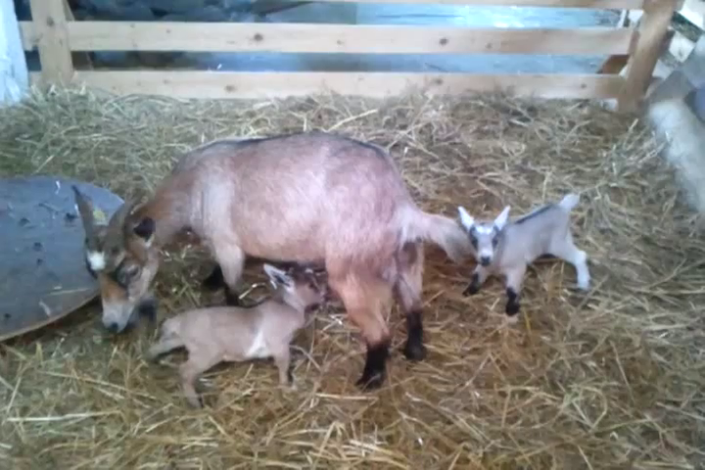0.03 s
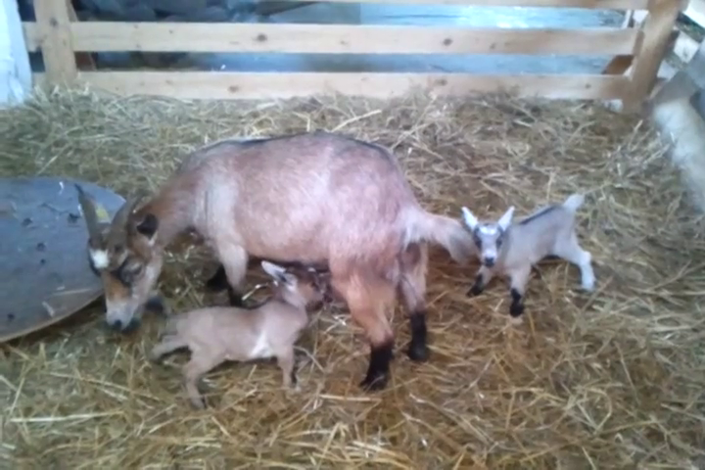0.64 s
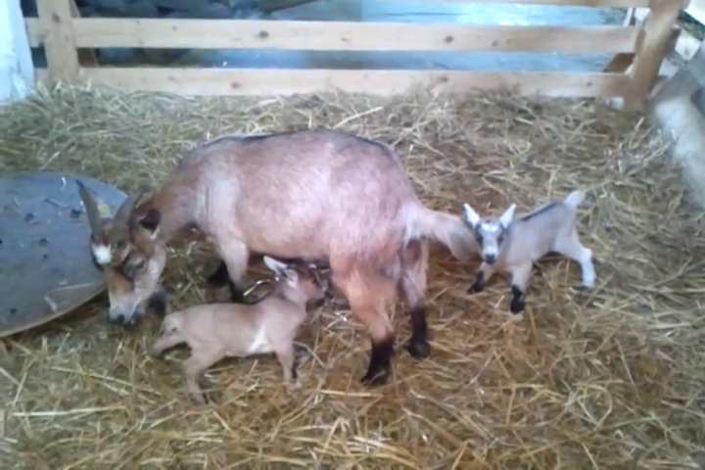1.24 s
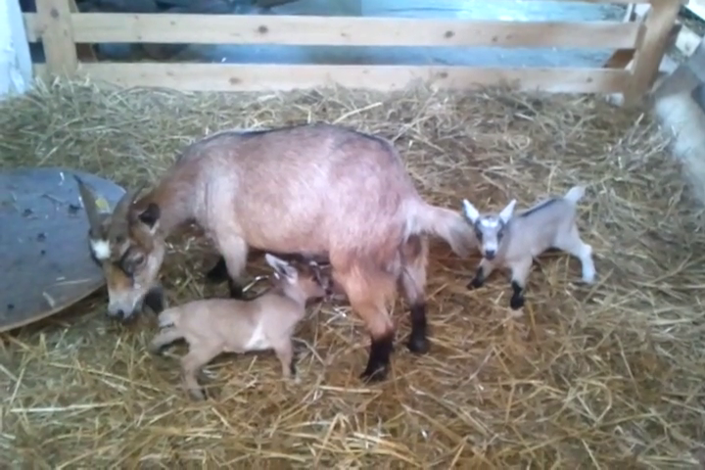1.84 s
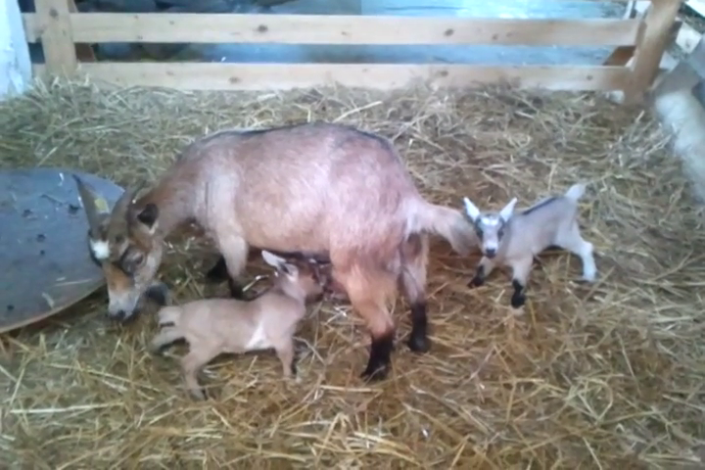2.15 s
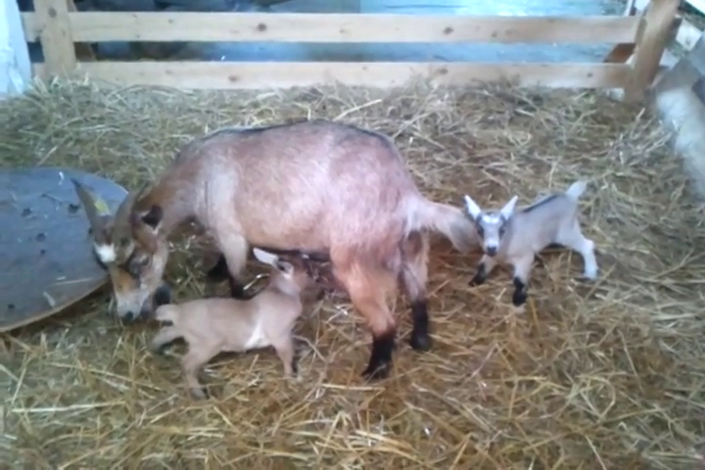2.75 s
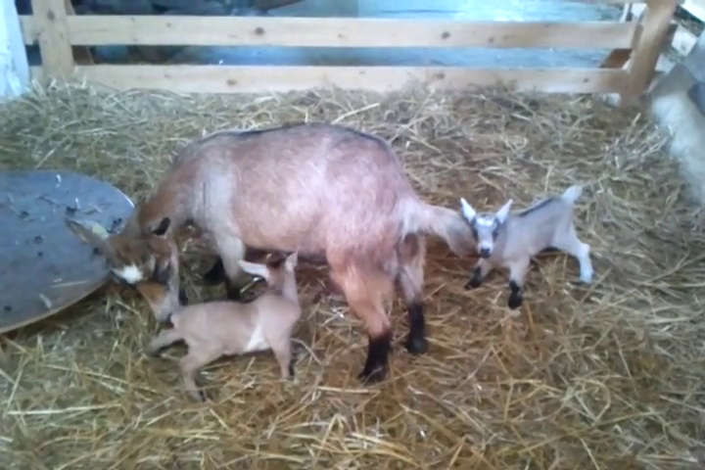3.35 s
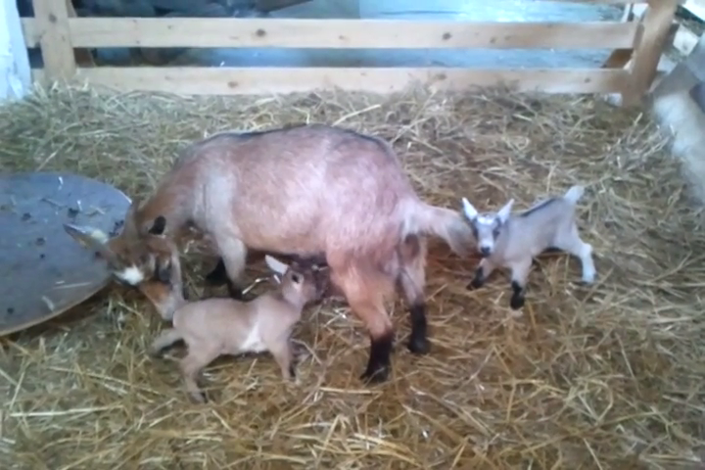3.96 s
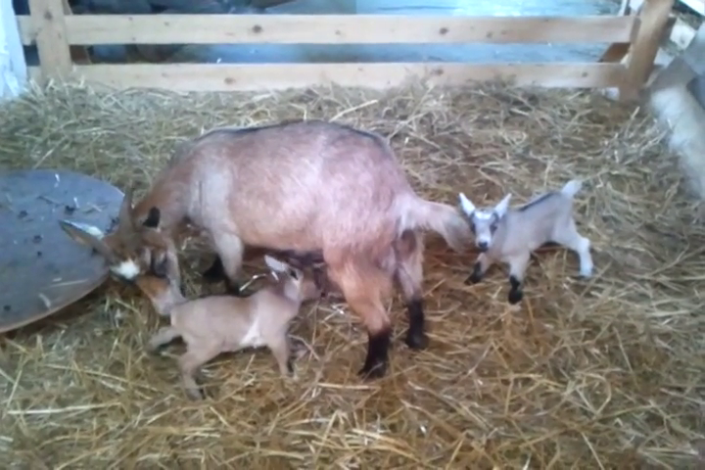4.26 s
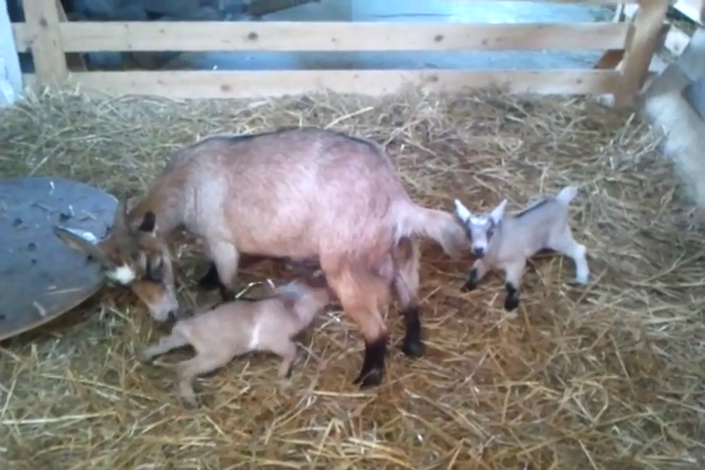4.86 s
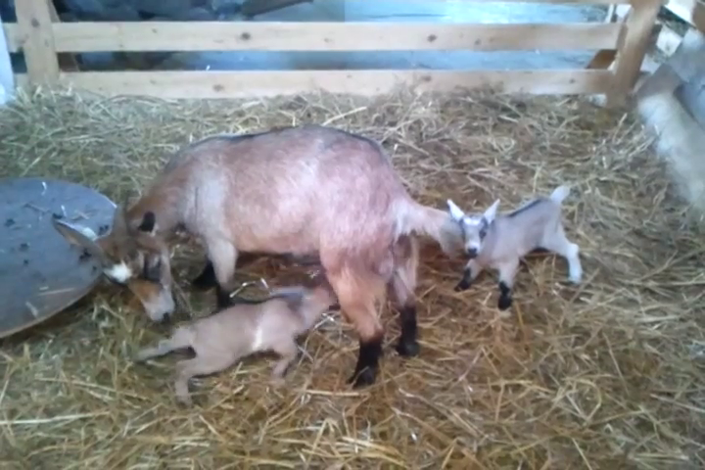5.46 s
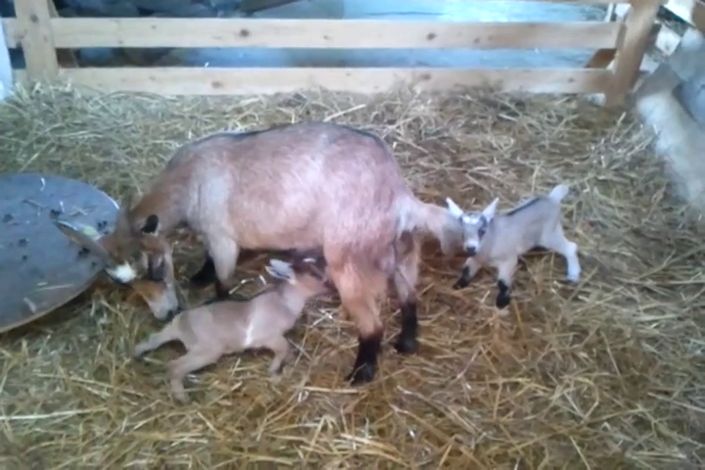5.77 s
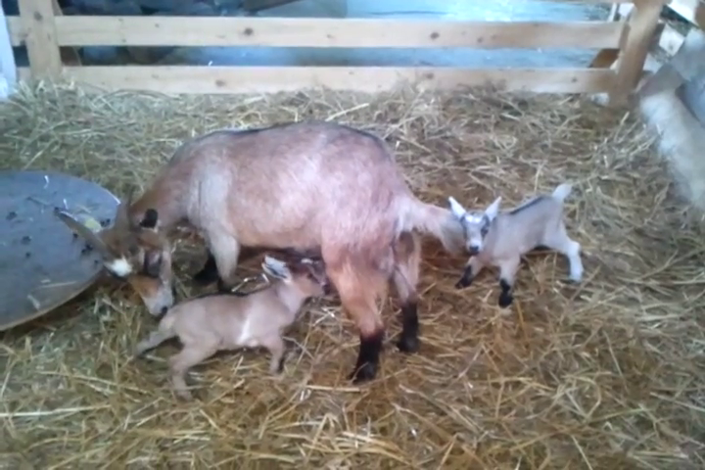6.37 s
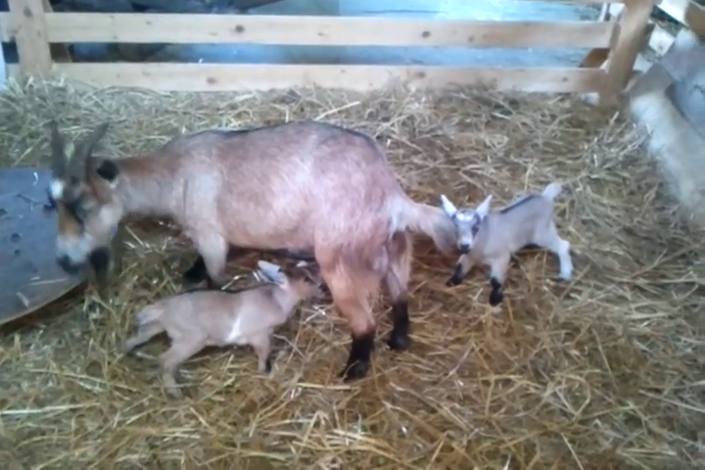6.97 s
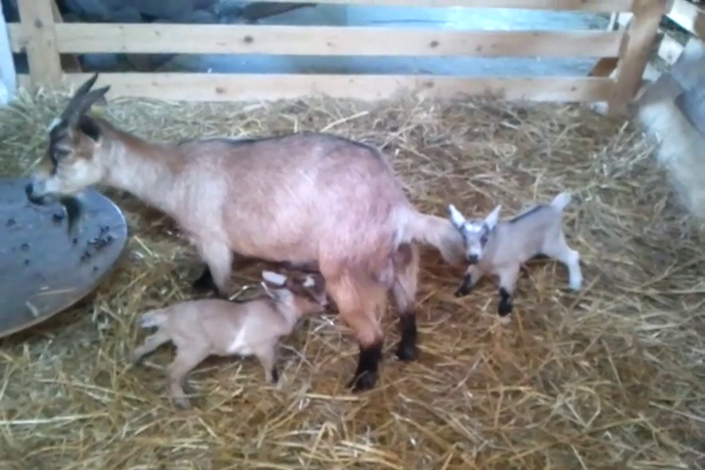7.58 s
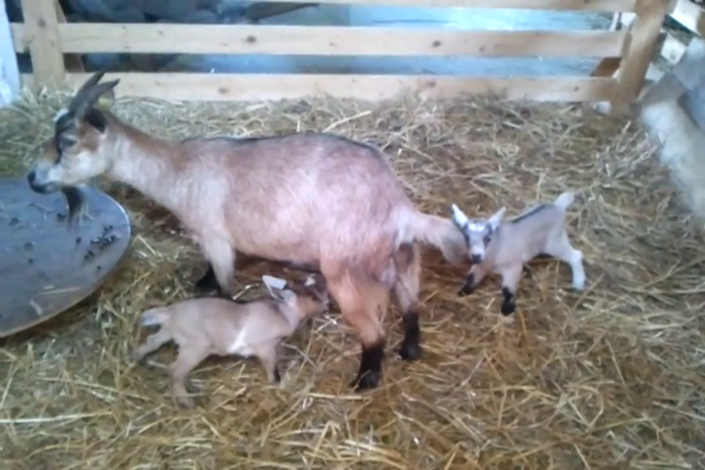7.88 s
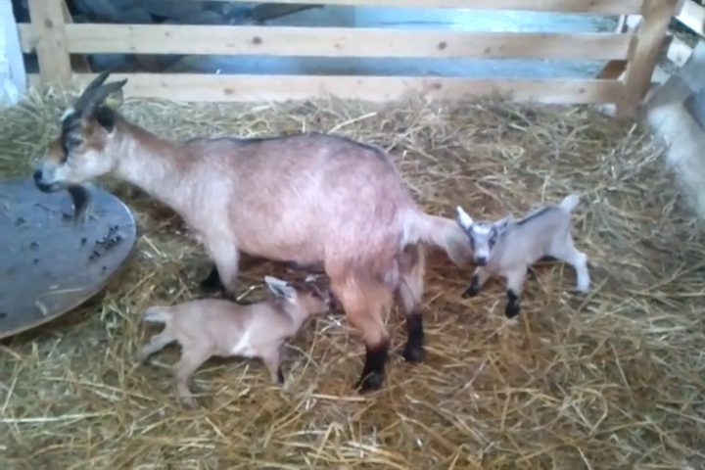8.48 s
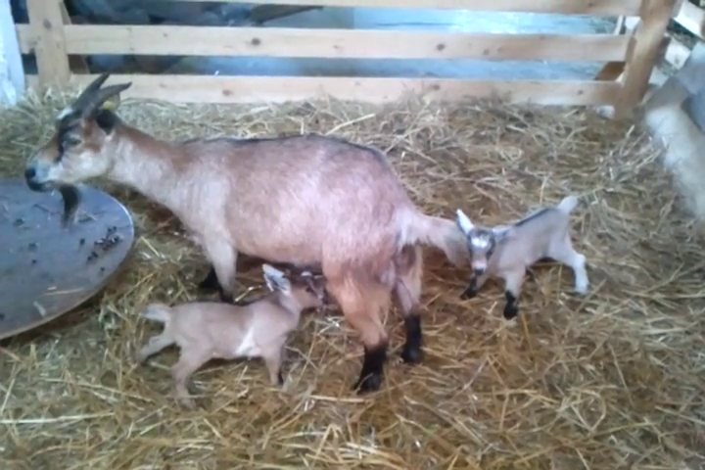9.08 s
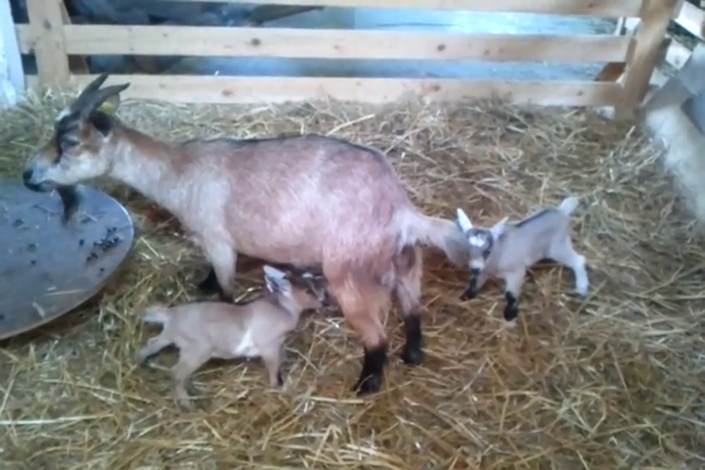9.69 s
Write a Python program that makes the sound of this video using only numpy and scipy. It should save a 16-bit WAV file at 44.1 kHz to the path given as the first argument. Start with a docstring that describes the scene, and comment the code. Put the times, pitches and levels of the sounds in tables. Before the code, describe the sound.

After silence, a steady microphone hiss fades in at about 0.7 seconds, together with a low outdoor rumble and two distant engines. One drones with a wavering level; the other slowly rises in pitch and fades after 5 seconds. Straw ticks very faintly under goats in a wooden pen. A slight rustle comes at 1 second, and soft knocks of hooves or mouths at about 2 and 2.5 seconds. From 4 to 5.7 seconds dry stalks snap and rustle, with a dull hoof knock just after 5. A second cluster of crackles, rustles and light knocks runs from 6.8 to 7.8 seconds, with the sharpest snap at 7.5. A few quick knocks and soft thuds follow around 9.2 seconds. The hiss grows a little louder towards the end, and the whole scene stays quiet.

```python
"""Goats in a straw pen

Inside a wooden pen, stalks snap and rustle as a kid nurses, with soft knocks of hooves and mouths.
Far outside, two engines drone over a low rumble, one steady and one slowly speeding up.
The small camera switches on after a moment; the hiss of its one microphone covers everything."""
import sys
import numpy as np
from scipy import signal
from scipy.fft import rfft, irfft, next_fast_len
from scipy.io import wavfile
from scipy.ndimage import uniform_filter1d

SR = 44100
rng = np.random.default_rng(int(sys.argv[2]) if len(sys.argv) > 2 else 0)


def put_to_file(sound):
    """Save the sound as 16-bit audio at rate SR, in the file named by the first command-line argument."""
    columns = np.atleast_2d(sound).T  # one column per channel
    safe = np.clip(columns, -1, 1)
    whole_steps = np.round(safe * 32767)
    wavfile.write(sys.argv[1], SR, whole_steps.astype(np.int16))


N = 429534
T = np.arange(N) / SR


def undb(db):
    """Decibels to gain."""
    return 10 ** (np.asarray(db) / 20)


def unit(x):
    """Scale to rms 1."""
    return x / np.sqrt(np.mean(x ** 2))


def curve(points):
    """A line through (time_s, value) points, one value a sample."""
    return np.interp(T, *np.transpose(points))


def walk(rate):
    """Smooth random drift of rms 1, changing about rate times a second."""
    step = max(int(SR / rate), 2)
    held = np.repeat(rng.standard_normal(N // step + 1), step)
    return unit(uniform_filter1d(uniform_filter1d(held, step), step)[:N])


def coloured(points):
    """Noise of rms 1, its spectrum shaped by (freq_hz, density_db) points."""
    hz, db = np.transpose(points)
    size = next_fast_len(N)
    bins_hz = np.maximum(np.fft.rfftfreq(size, 1 / SR), 1)
    gain = undb(np.interp(np.log(bins_hz), np.log(hz), db)) * np.minimum(bins_hz / hz[0], 1)
    return unit(irfft(rfft(rng.standard_normal(size)) * gain, size)[:N])


def resonate(x, hz, width_hz):
    """One resonance, gain 1 at its centre."""
    return signal.lfilter(*signal.iirpeak(hz, hz / width_hz, fs=SR), x)


def burst(t60_s, click=0):
    """A quarter second of dying noise, with an optional click at its start."""
    t = T[:SR // 4]
    return click * (t == 0) + rng.standard_normal(len(t)) * np.exp(-np.log(1000) * t / t60_s)


def add(out, start_s, x):
    """Mix x into out from start_s on."""
    i = int(start_s * SR)
    out[i:i + len(x)] += x[:N - i]


def outdoor_rumble(hum_hz=50):
    """Beyond the pen: a rumble that swells a little, and a faint deep hum; the upper part of this noise, up to
    9 kHz, is the microphone's own steady floor."""
    # rumble below, the microphone's steady floor with a bump near 8 kHz on top: freq_hz, density_db
    spectrum = [(20, -7), (35, 0), (50, -1), (68, -2.5), (110, -3), (170, -7.5), (280, -11), (450, -15),
                (800, -19), (1600, -23), (2500, -23), (3200, -26.5), (5500, -33), (8000, -20.5),
                (11000, -44.5)]
    rumble = coloured(spectrum) * undb(-44.5 + .5 * walk(4))
    hum = undb(-53.5 + 1.4 * walk(5)) * np.sin(2 * np.pi * hum_hz * T)
    return rumble + hum


def microphone_hiss():
    """The microphone's own smooth noise, a little louder towards the end."""
    # colour of the hiss: freq_hz, density_db
    spectrum = [(500, -8.5), (1400, -6.5), (2400, -8.5), (3200, -10.5), (3950, 0.5), (4600, 2), (5100, 0.5),
                (5600, -2.5), (6250, 2), (7000, -1.5), (8100, 0.5), (9000, 0.5)]
    # slow drift of the hiss: time_s, level_db
    levels = [(1, -41), (3.6, -43.5), (5.1, -40.5), (6.2, -41.5), (7.8, -38.5), (9.4, -36)]
    return coloured(spectrum) * undb(curve(levels) + 0.4 * walk(12))


def steady_engine():
    """A far engine: only four low harmonics reach the pen, and moving air makes them waver."""
    # firing rate, sagging a little under load and recovering: time_s, pitch_hz
    firing_rate = [(.7, 85.1), (5.2, 84.46), (8.3, 82.45), (9.74, 84.2)]
    # drone at the firing rate, before trim and waver: time_s, level_db
    drone_levels = [(0.9, -41.5), (3.72, -55.5), (5.19, -46.5), (5.43, -56), (6.34, -43), (6.39, -55),
                    (6.71, -41), (6.98, -47.5), (7.27, -39.5), (7.81, -54), (8.23, -39), (8.67, -59),
                    (9.38, -42.5), (9.7, -47.5)]
    # hum an octave and a fifth higher, before trim and waver: time_s, level_db
    hum_levels = [(0.9, -51), (1.46, -51), (1.83, -63), (2.0, -47.5), (2.74, -57), (3.86, -61.5),
                  (4.13, -48), (4.35, -54.5), (4.77, -45), (4.87, -49.5), (5.14, -37), (5.29, -47.5),
                  (6.1, -58.5), (7.32, -48), (7.67, -55.5), (8.72, -59.5), (9.23, -55), (9.7, -62.5)]
    drone_trim_db, hum_trim_db = -1, -0.1
    firing_hz = curve(firing_rate) * (1 + .003 * walk(7))
    phase = 2 * np.pi * np.cumsum(firing_hz) / SR
    drone_db = curve(drone_levels) + drone_trim_db + 1.5 * walk(7)
    hum_db = curve(hum_levels) + hum_trim_db + 1.6 * walk(9)
    # the even harmonics are weak and follow the odd ones below them
    harmonics_db = [drone_db, drone_db - 15, hum_db, np.minimum(hum_db - 9.5, -57)]
    return np.sqrt(2) * sum(undb(db) * np.sin(k * phase) for k, db in enumerate(harmonics_db, 1))


def climbing_engine():
    """A second far engine speeds up evenly: one low tone that swells, holds and dies away."""
    start_hz, climb_hz_per_s = 118.9, 2.5
    hold_db, hold_from_s, hold_to_s = -45.5, 1.48, 5.21
    rise_db_per_s, fall_db_per_s = 19, 5.5
    pitch_hz = start_hz + climb_hz_per_s * T
    rise_db = rise_db_per_s * np.minimum(T - hold_from_s, 0)
    fall_db = fall_db_per_s * np.minimum(hold_to_s - T, 0)
    level_db = hold_db + rise_db + fall_db + 2 * walk(8.7)
    return np.sqrt(2) * undb(level_db) * np.sin(2 * np.pi * np.cumsum(pitch_hz) / SR)


def knocks(thud_hz=230, thud_t60_s=.03):
    """Each contact in the pen rings briefly; weight on the bedding adds a dull thud."""
    # knocks and clicks of hooves and mouths: start_s, peak_db, ring_hz, width_hz, t60_s, thud_db
    contacts = [(1.94, -40.5, 900, 700, 0.066, -60), (1.978, -39, 1646, 110, 0.16, -60),
                (2.485, -40, 1100, 900, 0.17, -60), (4.67, -41, 520, 450, .16, -60),
                (5.1465, -28.5, 1000, 523, 0.0096, -30), (6.788, -43, 1240, 500, 0.031, -60),
                (7.036, -38, 1580, 600, 0.03, -60), (7.085, -32, 2300, 2183, 0.09, -60),
                (7.63, -41, 400, 400, 0.11, -33), (9.21, -33.5, 2050, 600, .018, -27),
                (9.216, -38, 1500, 160, 0.17, -64), (9.24, -36, 1500, 1200, 0.066, -64),
                (9.277, -49, 900, 900, .04, -30)]
    out = np.zeros(N)
    t = T[:SR // 4]
    thud = np.sin(2 * np.pi * thud_hz * t) * np.exp(-np.log(1000) * t / thud_t60_s)
    for start_s, peak_db, ring_hz, width_hz, t60_s, thud_db in contacts:
        ring = resonate(burst(t60_s, click=8.2), ring_hz, width_hz)
        ring = resonate(ring, ring_hz, 2 * width_hz)
        add(out, start_s, undb(peak_db) * ring / np.abs(ring).max() + undb(thud_db) * thud)
    return out


def stalk_ring(x, centre_hz):
    """Hollow stalks ring; their thickness decides which range speaks most."""
    # resonances of a stalk: ring_hz, width_hz, gain_db
    modes = [(3970, 440, 5.5), (4440, 930, 8.5), (6020, 290, 3), (7120, 820, -2), (8750, 2300, 6)]
    ring = sum(undb(db) * resonate(x, hz, width_hz) for hz, width_hz, db in modes)
    # thin stalks radiate little below their lowest ring
    low_cut = signal.butter(3, modes[0][0] - 500, "high", fs=SR, output="sos")
    return resonate(signal.sosfilt(low_cut, ring), centre_hz, width_hz=2000)


def straw_ticks(ticks_per_s=14):
    """The bedding keeps ticking faintly under the animals' weight."""
    impulses = (rng.random(N) < ticks_per_s / SR) * rng.standard_normal(N)
    ticks = signal.fftconvolve(impulses, burst(t60_s=0.024))[:N]
    return undb(-60.5) * unit(stalk_ring(ticks, centre_hz=6800))


def straw_rustles(cracks_per_s=3000):
    """Brushed straw gives a swell of tiny uneven cracks."""
    # legs and muzzles brushing the straw: middle_s, level_db, half_length_s, centre_hz
    brushes = [(1.074, -49, .05, 8080), (4.977, -42.5, 0.057, 6800), (5.2, -54, .12, 5200),
               (5.598, -44.5, 0.032, 7200), (6.812, -44, 0.019, 7146), (7.54, -44, .015, 5800),
               (7.644, -47, 0.025, 6800), (7.749, -50, .02, 4500)]
    out = np.zeros(N)
    t = T[:SR // 2] - 1 / 4
    for middle_s, level_db, half_length_s, centre_hz in brushes:
        cracks = rng.standard_normal(len(t)) * (rng.random(len(t)) < cracks_per_s / SR)
        swell = np.exp(-(t / half_length_s) ** 2)
        add(out, middle_s + t[0], undb(level_db) * unit(stalk_ring(cracks, centre_hz)) * swell)
    return out


def straw_snaps():
    """Single dry stalks crack; the boards of the pen add a short tail."""
    # stalks breaking: start_s, peak_db, centre_hz, t60_s
    snaps = [(4.094, -29, 7500, .02), (4.241, -28, 7400, .03), (4.776, -31, 6000, .02),
             (4.917, -30, 7200, .02), (5.1463, -36, 7000, .01), (5.602, -29, 7200, .035),
             (5.7047, -21.5, 7700, 0.02), (7.085, -20.5, 7690, 0.06), (7.316, -27, 6030, .045),
             (7.5285, -16, 6100, 0.027), (7.731, -27, 4460, .03), (7.746, -32, 4800, 0.044)]
    out = np.zeros(N)
    for start_s, peak_db, centre_hz, t60_s in snaps:
        fracture = burst(t60_s, click=7.8)
        board_tail = undb(-14) * burst(t60_s=0.13)
        crack = stalk_ring(fracture + board_tail, centre_hz)
        add(out, start_s, undb(peak_db) * crack / np.abs(crack).max())
    return out


def scene():
    """The pen and the far engines, heard by one microphone."""
    background = steady_engine() + climbing_engine() + outdoor_rumble() + microphone_hiss()
    straw = straw_snaps() + straw_rustles() + straw_ticks()
    return (background + straw + knocks())[None]


def record(dry):
    """The camera fades in from silence, carries a settling bias, rounds the treble and cuts the top."""
    switch_on_s, fade_s = .739, 0.26
    roll_off_hz, top_hz = 8188, 9800
    fade = (T >= switch_on_s) * np.clip(0.13 + (T - switch_on_s) / fade_s, 0, 1)
    bias = 0.029 + 0.035 * np.exp(-T / 2.84)
    roll_off = signal.butter(15, roll_off_hz, fs=SR, output="sos")
    top_cut = signal.ellip(10, .2, 70, top_hz, fs=SR, output="sos")
    rounded = signal.sosfilt(roll_off, (dry + bias) * fade)
    return signal.sosfilt(top_cut, rounded)


dry = scene()
out = record(dry)
put_to_file(out)
```